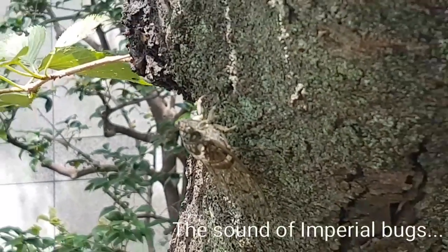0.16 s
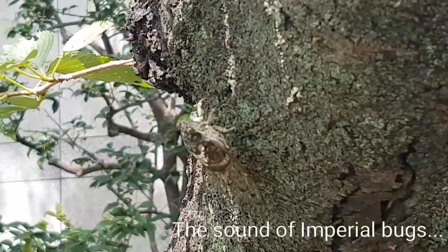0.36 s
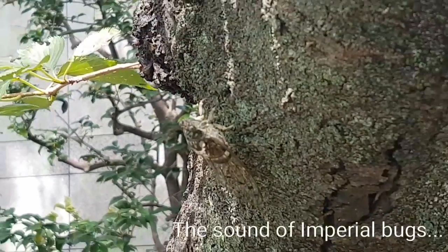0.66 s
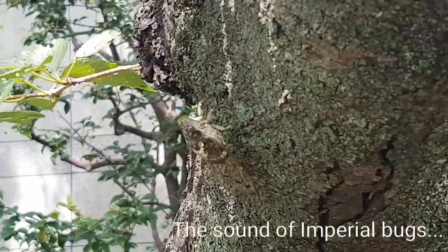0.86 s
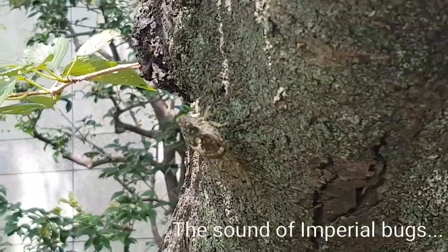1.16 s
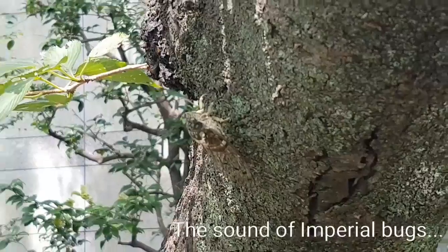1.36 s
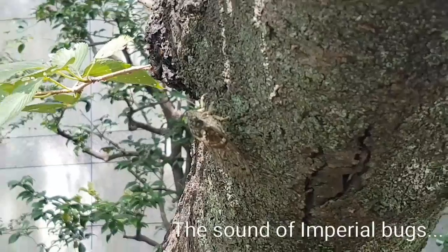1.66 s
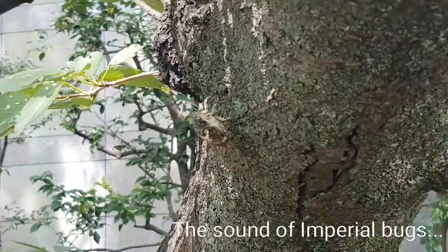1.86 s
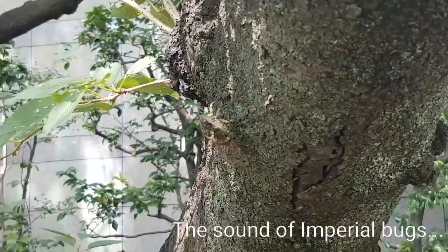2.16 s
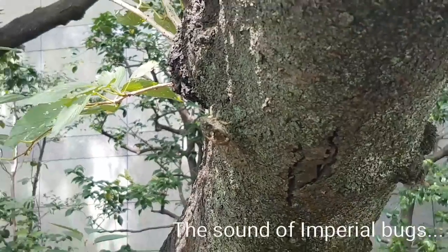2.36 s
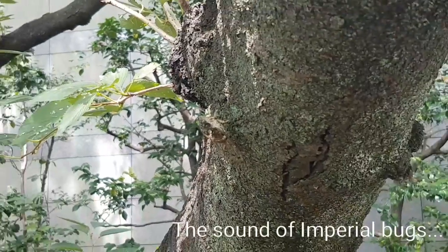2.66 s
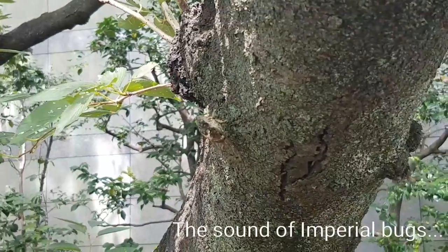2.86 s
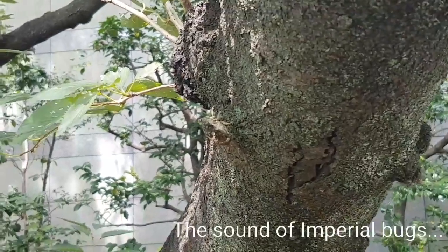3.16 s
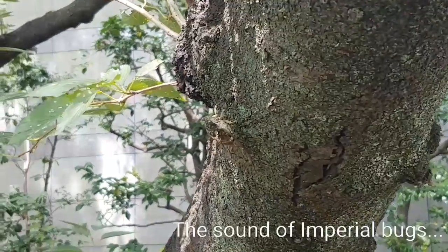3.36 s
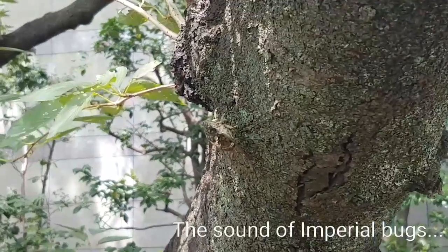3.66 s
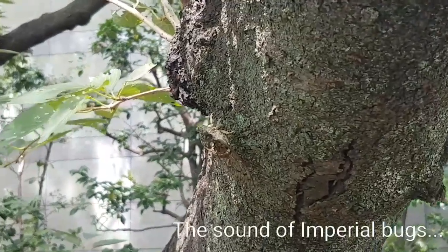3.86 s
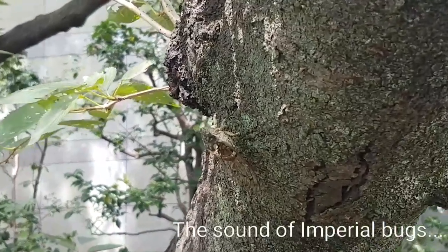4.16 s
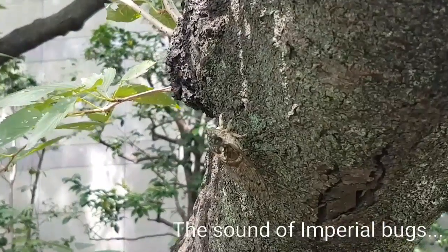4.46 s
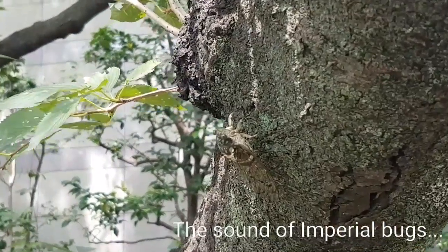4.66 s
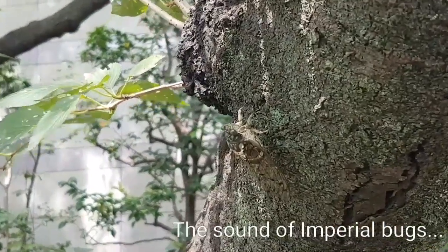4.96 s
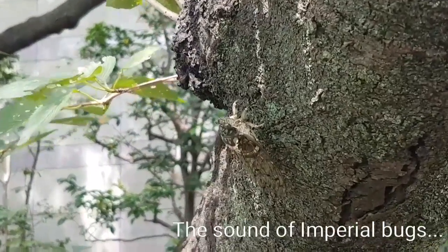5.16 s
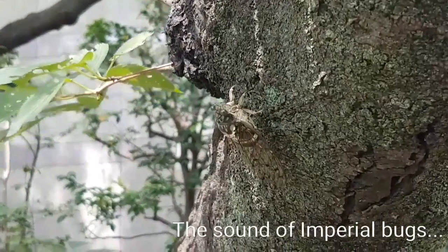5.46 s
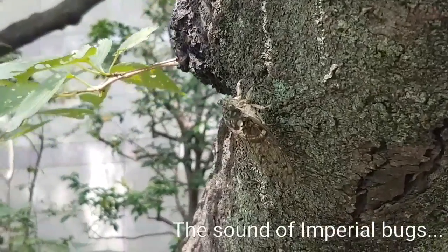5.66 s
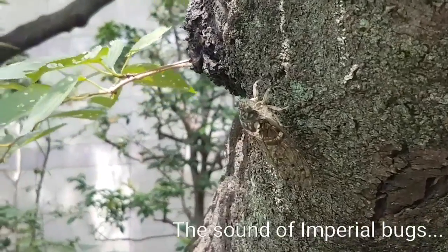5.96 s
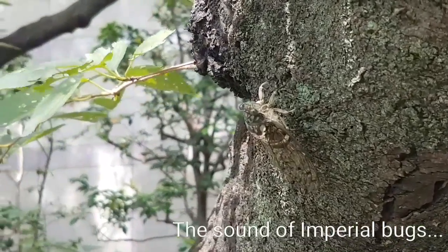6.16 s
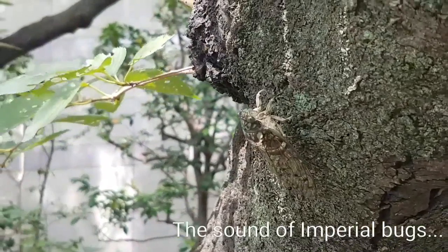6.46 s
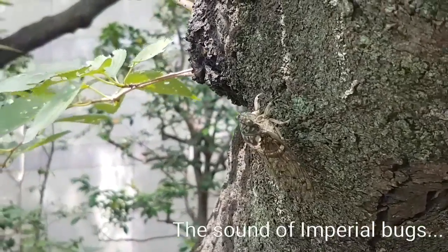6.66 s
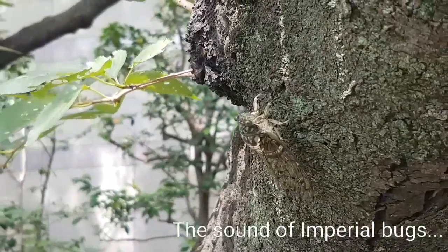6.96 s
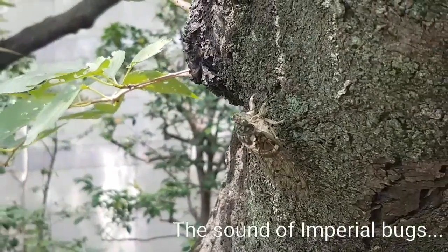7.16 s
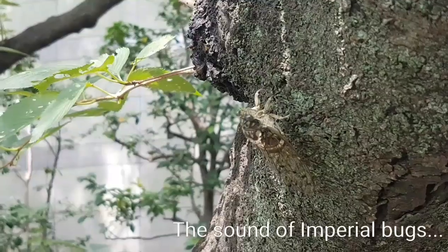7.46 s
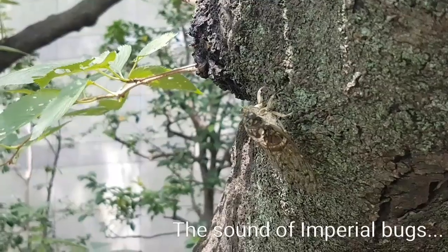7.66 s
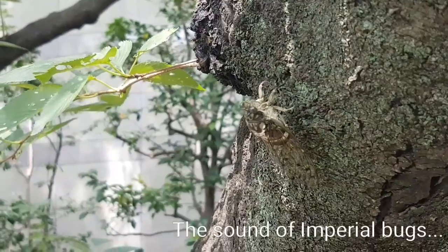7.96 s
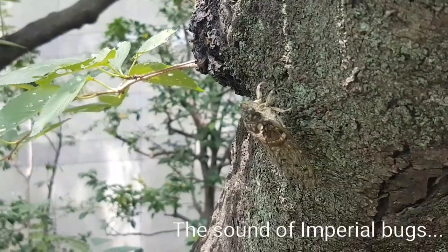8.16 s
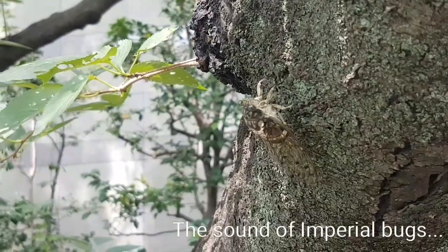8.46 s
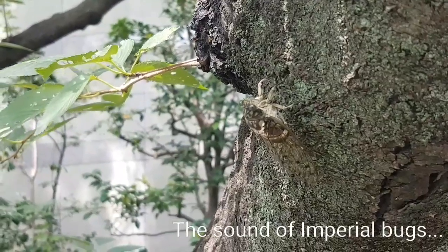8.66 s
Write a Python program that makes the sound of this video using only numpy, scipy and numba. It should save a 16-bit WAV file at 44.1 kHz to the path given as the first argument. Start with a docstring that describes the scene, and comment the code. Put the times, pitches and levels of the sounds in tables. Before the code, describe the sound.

Outdoors in a town garden, a single cicada on a tree trunk sings close to a stereo microphone. A bright buzz bursts, drops to a quieter slow rattle of ticks and dull snaps, then speeds up and swells into a piercing ring, followed by more bursts. The phrase repeats about every four seconds. Faint traffic rumble, rushing air and a low engine hum lie far behind.

```python
"""A town garden: a cicada sings on a tree trunk, close to the two-port microphone.
Its two tymbals buckle in and spring back in turn: high ticks and dull snaps while the abdomen is shut,
a loud ringing buzz, made by resonances that those clicks excite, as it opens.
Each phrase slows to a rattle, speeds up into a long swell and is followed by bursts, long or short.
Far off, noise rumbles and rushes as traffic, sines hum and whine as machines, and something twitters."""
import sys
import numpy as np
from scipy import signal
from scipy.fft import rfft, irfft, next_fast_len
from scipy.io import wavfile
from scipy.ndimage import uniform_filter1d, map_coordinates
from numba import njit

SR = 44100
rng = np.random.default_rng(int(sys.argv[2]) if len(sys.argv) > 2 else 0)


def digitize_waveform(pressure):
    """Quantize a signal to 16-bit integers and store it at the path in sys.argv[1].

    Rows of a 2-D input are taken as channels; values are limited to [-1, 1].
    """
    field = np.atleast_2d(pressure).T
    bounded = np.clip(field, -1, 1)
    quanta = np.round(bounded * 32767).astype(np.int16)
    wavfile.write(sys.argv[1], SR, quanta)


N = 388521
TIME = np.arange(N) / SR

# Muscle rhythm of each tymbal, before it wavers: start_s [s], rate [cycles per s]
MUSCLE_RHYTHM = [(0.0, 148.5), (0.13, 162.4), (0.23, 169.5), (0.31, 172.2), (0.45, 173.3), (0.57, 174.2),
                 (0.8, 167.6), (0.93, 160.0), (1.0, 145.7), (1.13, 141.0), (1.32, 134.5), (1.62, 117.4),
                 (1.95, 91), (2.2, 82), (2.45, 74), (2.85, 74.5), (3.05, 91), (3.26, 116), (3.75, 126.5),
                 (3.9, 134), (4.09, 159.7), (4.29, 168.5), (4.42, 172.3), (4.51, 170.8), (4.63, 171.0),
                 (4.82, 168.7), (5.0, 160.6), (5.1, 142.5), (5.25, 138.1), (5.45, 128), (5.7, 113.4),
                 (6.0, 90), (6.25, 85), (6.5, 76), (6.7, 82), (7.0, 114), (7.2, 122), (7.56, 131.5),
                 (7.88, 166.6), (7.95, 171.8), (8.02, 172.3), (8.21, 167.7), (8.3, 157.8), (8.44, 141),
                 (8.56, 139.6), (8.8, 127.2)]
# Phrases, a rattle that grows into a swell: start_s [s], climax_s [s], closing_s [s],
# buzz_gain_db [dB], tick_gain_db at full opening [dB]
PHRASES = [(-3.0, -0.06, .32, -2.5, -10), (1.03, 4.085, .18, -0.8, -9), (5.11, 7.878, .1, 1.9, -7.5),
           (8.39, 11.1, .1, 4.5, -12)]
# How the abdomen opens in every phrase: from_climax_s [s], opening [0-1], resonance_hz [Hz],
# back_ms [ms], the time for a tymbal to spring back before a wide opening shortens it
SWELL_POSTURE = [(-3.0, .1, 2950, 1.68), (-2.3, .115, 2900, 1.8), (-1.7, .22, 3120, 1.9),
                 (-1.3, .26, 3520, 1.85), (-1.0, .32, 3700, 1.95), (-.79, .6, 3930, 2.1),
                 (-.55, .57, 3990, 2.08), (-.33, .69, 4200, 2.0), (0, .89, 4450, 1.85)]
# Bursts after the swells, long or short: start_s [s], end_s [s], opening [0-1],
# top_resonance_hz [Hz], buzz_gain_db [dB], tick_gain_db that is approached when open [dB]
BURSTS = [(.268, .563, .98, 4560, .4, -17), (.915, 1.043, .68, 4200, -3, -12),
          (4.398, 4.617, .96, 4560, -1.5, -17), (4.978, 5.124, .77, 4300, -4.5, -15),
          (8.232, 8.396, .77, 4300, -4.6, -15)]
# The second tymbal limps behind the half cycle: start_s [s], late_ms [ms]
SECOND_TYMBAL_LIMP = [(0, .14), (.26, .13), (.32, .065), (.41, .06), (.435, .11), (.56, .11), (.62, .08),
                      (1.2, .13), (4.2, .125), (4.3, .085), (4.5, .06), (4.54, .11), (4.62, .11),
                      (4.75, .075), (5.3, .13), (7.7, .13), (7.88, .065), (7.96, .05), (8.1, .1),
                      (8.8, .14)]
# A wide-open abdomen pulls the tymbal back sooner, harder and more exactly:
# opening [0-1], sooner_ms [ms], wander_ms [ms], return_click_db re the inward click [dB]
SPRING_BACK = [(.25, 0.0, .012, -5.0), (.6, 0.0, .05, -5.0), (.89, 0.0, .06, -5.0), (.915, .28, 0.0, -2.0)]
# The return tick fades at speed: rate [cycles per s], return_db re the inward tick [dB]
RETURN_TICK = [(80, 1), (138, -6), (165, -17)]
# Lower edge of the buzz: opening [0-1], edge [share of the resonance]
BUZZ_LOW_EDGE = [(.15, .74), (.35, .72), (.6, .64), (.85, .7), (.95, .83)]
# The abdomen's upper mode: opening [0-1], ratio to the resonance [-], level_db [dB]
UPPER_MODE = [(.2, 1.6, 0.0), (.35, 1.42, -1.0), (.58, 1.34, 0.0), (.85, 1.42, -2.5)]
# Radiation of the abdomen: pitch_hz [Hz], level_db [dB]
ABDOMEN_RADIATION = [(500, -14), (1400, 4.6), (2200, 4.6), (3000, 1.8), (4500, 0), (5400, 0.5), (6500, 1),
                     (7400, -3.5), (8500, -10.5), (9700, -8.5), (11000, 0), (15000, -31)]
# Relative spectra of the ticks, abdomen shut and open: pitch_hz [Hz], level_db [dB]
SHUT_TICK_SPECTRUM = [(6000, -70), (8500, -40), (10000, -20), (11200, -4), (12400, 3.5), (13600, 5.5),
                      (14500, 3), (15500, -6)]
OPEN_TICK_SPECTRUM = [(6000, -60), (8500, -26), (9700, -12), (10900, 0), (12000, 1), (13600, 1.5),
                      (14500, 1), (15500, -6)]
# Relative spectrum of the dull snaps: pitch_hz [Hz], level_db [dB]
SNAP_SPECTRUM = [(150, -8), (330, 1.5), (520, -1), (900, -2.5), (1500, -1.5), (3000, -2.5), (5000, 1),
                 (6500, 2), (7700, 0), (8700, -14), (11000, -73)]
# Left-right balance and uneven loudness of the ticks:
# start_s [s], left_right_db before each tymbal's own [dB], gain_db [dB]
TICK_BALANCE = [(0.0, 6.0, -1.5), (0.22, 7.5, 1.5), (0.8, 5.5, 1.0), (1.25, 6.0, 1.3), (2.5, 5.5, -0.5),
                (3.1, 5.0, 1.3), (3.85, 1.5, -1.8), (4.25, 3.0, -0.7), (5.3, 2.0, -0.7), (5.9, 0.0, -1.7),
                (6.4, -0.5, -1.2), (6.85, -0.5, 1.3), (7.2, -0.7, 0.0), (7.6, -0.7, -1.0),
                (7.92, -1.2, 1.5), (8.1, -1.0, -1.0), (8.45, -1.2, -2.5), (8.8, -1.2, 0.8)]
# The far tymbal's ticks come into view as the microphone moves: start_s [s], level_db re the near one [dB]
FAR_TICK_LEVEL = [(0, -8), (2.5, -10), (4.2, -8), (5.3, -7), (6.4, -5), (8.1, -4), (8.8, -6)]
# The ticks reach the left port first: start_s [s], lead_ms [ms]
TICK_PORT_LEAD = [(0, .016), (5.6, .015), (6.0, .024), (7.2, .021)]
# The town, before the trims in town(): start_s [s], rumble_db [dB], rush_db [dB], engine_hum_db [dB]
TOWN_LEVELS = [(0.0, -43, -40, -48), (0.07, -42, -41, -45), (1.44, -55, -53, -61), (3.19, -39, -38, -39),
               (3.75, -39, -34, -40), (4.21, -40, -42, -38), (4.36, -51, -50, -49), (4.9, -54, -54, -51),
               (5.88, -55, -52, -53), (6.25, -51, -55, -55), (7.25, -46, -48, -42), (7.89, -47, -52, -46),
               (8.1, -53, -58, -54), (8.28, -54, -58, -59), (8.73, -55, -51, -58), (8.8, -55, -52, -73)]
# Engine hum, before it wanders: start_s [s], pitch_hz [Hz]
HUM_PITCH = [(0, 88.9), (2.5, 91.66), (4.0, 89.87), (5.5, 89.1), (7.0, 87.8), (8.8, 84.7)]
# Partials of the engine hum: order [multiple of its pitch], level_db [dB]
HUM_ORDERS = [(1, 0), (3, -13), (6, -14.5)]
# Relative spectra of traffic rumble, traffic rush and garden hiss: pitch_hz [Hz], level_db [dB]
RUMBLE_SPECTRUM = [(20, -36), (40, -8.5), (70, -4), (120, -0.5), (190, -1.5), (300, -10.5), (600, -26),
                   (2000, -27)]
RUSH_SPECTRUM = [(120, -27), (260, 1.5), (420, -3.5), (800, -10.5), (1500, -14), (4000, -7), (12000, -48)]
AIR_SPECTRUM = [(30, 6), (200, -28), (1000, -6), (1800, 8), (2800, 7), (4000, 3), (6500, 12), (8500, -20),
                (15000, -65)]
# Faint high twitter far off, before it flutters: start_s [s], level_db [dB]
TWITTER_LEVEL = [(2.33, -75), (2.44, -44), (2.7, -43), (2.85, -75)]
# Relative spectrum of the twitter: pitch_hz [Hz], level_db [dB]
TWITTER_SPECTRUM = [(3800, -35), (4500, 0), (5000, -3), (5500, 0), (6200, -35)]

BAND_PASS, HIGH_PASS = -1, 1
FULL_SPEED_PER_S = 170   # tymbal cycles per second
# Movement of the abdomen
BURST_ATTACK_S, BURST_RELEASE_S = .034, .054
ATTACK_EASE, RELEASE_EASE = 1.7, 1.4   # above 1 the abdomen starts and stops moving gently
BURST_FIRST_SHARE = .86   # a burst jumps to this share of its opening, then widens to its end
SHUT_HZ = 2800   # resonance of the shut abdomen
SWELL_GLIDE_POWER, BURST_GLIDE_POWER = 2.4, 1.0   # how much faster the resonance sinks than the opening
START_SAG, END_SAG = .38, .15   # share of a burst's resonance rise that is missing at either end
ARCH_TOP = .62   # share of the burst after which the resonance tops out
REST_BACK_MS = 1.76   # time to spring back in the bursts, before a wide opening shortens it
# Timing scatter of the tymbals: at full speed, added at a crawl, added under strain
JITTER_S, SLOW_JITTER_S, STRAIN_JITTER_S = .000005, .00012, .00004
LONGEST_LAG_S = .0059   # longest wait of the second tymbal after the beat, before scatter
# Ring and buzz
SHUT_WIDTH_HZ, OPEN_WIDTH_HZ, UPPER_WIDTH_HZ = 620, 335, 750
SHUT_RING_DB, OPEN_RING_DB = 10.0, 16.0   # gain of the ring's resonance, fed by the bare membrane
BUZZ_DB, BUZZ_DB_PER_DECADE, SHUT_LEAK = -16, 32, .08   # level against opening plus leak
BUZZ_PAN_DB = -4.3
# Ticks and snaps: level at full speed, growth with speed
TICK_DB, TICK_DB_PER_DECADE = -22.0, 13
SNAP_DB, SNAP_DB_PER_DECADE = -39.3, 12
TICK_MUTE_POWER = 2.5   # steepness with which the opening mutes the ticks
TICK_CLOSE_SHARE = .38   # the ticks die down over this share of a burst
TICK_LEAD_S = .02   # the ticks change just ahead of the buzz
SNAP_MUTE_SHARE = .8   # the opening mutes the dull snaps less than the ticks
BLURRED_SHARE = .7   # share of tick power that is blurred into a diffuse hiss when wide open
BARK_ECHO_DB, GARDEN_ECHO_DB = -7.5, -15.5
# Garden hiss, faint fading machine whine, top cut
GARDEN_AIR_DB = -53
WHINE_HZ, WHINE_DB, WHINE_FADE_DB_PER_S = 564, -46.5, 14   # centre pitch, level at the start, fade
CUTOFF_HZ = 14650


def from_db(db):
    """Decibels to gain."""
    return 10 ** (np.asarray(db) / 20)


def rms_one(x):
    """Scale to rms 1."""
    return x / np.sqrt(np.mean(x ** 2) + 1e-20)


def read(rows, when=TIME):
    """The columns of a curve table, interpolated at the given values of its first column."""
    at, *columns = np.transpose(rows)
    return [np.interp(when, at, column) for column in columns]


def colour(x, spectrum):
    """Filter by a spectrum of (Hz, dB) points, without phase shift."""
    hz, db = np.transpose(spectrum)
    size = next_fast_len(N + 4096)
    grid = np.maximum(np.fft.rfftfreq(size, 1 / SR), 1)
    gain = from_db(np.interp(np.log(grid), np.log(hz), db))
    return irfft(rfft(x, size) * gain, size)[..., :N]


def drift(per_s):
    """Slow chance of spread 1, with per_s random points a second."""
    return rms_one(np.interp(TIME * per_s, np.arange(4000), rng.standard_normal(4000)))


def clicks(times, db):
    """Band-limited clicks that may fall between samples."""
    at = times[:, None] * SR
    taps = np.round(at).astype(int) + np.arange(-8, 9)
    shape = np.sinc(taps - at) * np.cos(np.pi * (taps - at) / 18) ** 2
    inside = (taps >= 0) & (taps < N)
    return np.bincount(taps[inside], (shape * from_db(db)[:, None])[inside], N)


@njit
def resonate(x, hz, width_hz, zero):
    """A resonance with moving centre and width: band-pass if zero is -1, resonant high-pass if it is 1."""
    y = np.zeros(len(x))
    for i in range(2, len(x)):
        r = np.exp(-np.pi * width_hz[i] / SR)
        w = 2 * np.pi * hz[i] / SR
        gain = (1 - r * r) / 2 if zero < 0 else r
        driven = gain * (x[i] - (1 + zero) * x[i - 1] + zero * x[i - 2])
        y[i] = driven + 2 * r * np.cos(w) * y[i - 1] - r * r * y[i - 2]
    return y


def even(x):
    """Hold the power at 1 over a few cycles, keeping the single clicks."""
    power = uniform_filter1d(uniform_filter1d(x ** 2, size=1200), size=900)
    return x / np.sqrt(np.maximum(power, 1e-14))


def place(x, pan_db, lead_ms):
    """Two microphone ports: the left one hears the insect a little earlier."""
    late = map_coordinates(x, [np.arange(N) - lead_ms * SR / 1000], order=5)
    gains = from_db(np.array([[1], [-1]]) * pan_db / 2)
    return np.array([x, late]) * gains / np.sqrt(np.mean(gains ** 2, axis=0))


def scatter(x, t60, delay_s):
    """Dense echoes that die away by 60 dB in t60 seconds, unrelated at the two ports."""
    t = TIME[:SR // 2]
    tail = rng.standard_normal((2, len(t))) * from_db(-60 * t / t60) * (t > delay_s)
    tail /= np.sqrt(np.sum(tail ** 2, axis=1, keepdims=True))
    return signal.fftconvolve(x[None], tail, axes=1)[:, :N]


def stereo_noise(spectrum, side_db):
    """Coloured noise of rms 1 whose width grows from the bass upwards."""
    mid, side = colour(rng.standard_normal((2, N)), spectrum)
    side = from_db(side_db) * colour(side, [(80, -14.5), (250, -13), (700, -4.5)])
    return rms_one(np.array([mid + side, mid - side]))


def swell_move(when, start, climax, closing_s, buzz_db, tick_db):
    """The abdomen opens along the swell curve, then closes after the climax while its resonance sinks."""
    held, hz, back_ms = read(SWELL_POSTURE, when - climax)
    gate = (when > start) * np.exp(-(np.maximum(when - climax, 0) / closing_s) ** RELEASE_EASE)
    rise_hz = (hz - SHUT_HZ) * gate ** SWELL_GLIDE_POWER
    return held * gate, rise_hz, back_ms, buzz_db, tick_db * held * gate ** TICK_MUTE_POWER


def burst_move(when, start, end, wide, hz, buzz_db, tick_db):
    """The abdomen jumps open, widens a little and shuts; its resonance arches meanwhile."""
    since = np.maximum(when - start, 0)
    progress = np.minimum(since / (end - start), 1)
    release = np.exp(-(np.maximum(when - end, 0) / BURST_RELEASE_S) ** RELEASE_EASE)
    gate = (1 - np.exp(-(since / BURST_ATTACK_S) ** ATTACK_EASE)) * release
    share = BURST_FIRST_SHARE + (1 - BURST_FIRST_SHARE) * progress
    sag = np.where(progress < ARCH_TOP, START_SAG, END_SAG)
    arch = 1 - sag * np.interp(progress, [0, ARCH_TOP, 1], [-1, 0, 1]) ** 2
    rise_hz = (hz - SHUT_HZ) * arch * gate ** BURST_GLIDE_POWER
    muted = (1 - np.exp(-progress / TICK_CLOSE_SHARE)) * release ** TICK_MUTE_POWER
    return wide * share * gate, rise_hz, np.full(len(when), REST_BACK_MS), buzz_db, tick_db * muted


def posture(when=TIME):
    """The abdomen's opening 0-1, resonance in Hz, spring-back time in ms, buzz and tick gains in dB."""
    moves = [swell_move(when, *phrase) for phrase in PHRASES]
    moves += [burst_move(when, *burst) for burst in BURSTS]
    openings, rises, backs, buzz_gains, tick_gains = map(np.array, zip(*moves))
    # the widest move counts most
    weights = openings ** 2 + 1e-12
    weights /= weights.sum(axis=0)
    is_open = np.clip(openings.max(axis=0), 0, 1)
    centre_hz = SHUT_HZ + rises.max(axis=0)
    back_ms = np.sum(backs * weights, axis=0)
    return is_open, centre_hz, back_ms, buzz_gains @ weights, tick_gains.min(axis=0)


def tymbal(buckle, back, level_db, back_db, spread_db):
    """One tymbal buckles and springs back, never twice alike: inward clicks, return clicks and ticks."""
    a, b, c, d = level_db + spread_db * rng.standard_normal((len(buckle), 4)).T
    ticks = clicks(buckle, c) + clicks(back, d + back_db)
    return clicks(buckle, a), clicks(back, b), ticks


def tymbal_pair(second_db=-0.8, slow_second_db=-1.0, waver_share=.02, waver_per_s=22):
    """The two tymbals work in turn, in time with the muscle rhythm, which wavers when it is slow."""
    pace, = read(MUSCLE_RHYTHM)
    slowness = np.clip(FULL_SPEED_PER_S / pace - 1, 0, 1)
    pace = pace * (1 + waver_share * slowness * drift(waver_per_s))
    cycles = np.cumsum(pace) / SR
    beat = np.interp(np.arange(int(cycles[-1])), cycles, TIME)
    rate, = read(MUSCLE_RHYTHM, beat)
    is_open, _, back_ms, _, _ = posture(beat)
    sooner_ms, wander_ms, _ = read(SPRING_BACK, is_open)
    back_db, = read(RETURN_TICK, rate)
    chance = rng.standard_normal((len(beat), 4)).T
    # a slow muscle keeps time less well, above all with the abdomen open
    slack = np.clip(168 / rate - 1, 0, 1)
    strain = is_open * np.minimum(6 * slack, 1)
    loose_s = JITTER_S + SLOW_JITTER_S * slack ** 0.73 + STRAIN_JITTER_S * strain
    late_s = read(SECOND_TYMBAL_LIMP, beat)[0] / 1000
    first = beat + loose_s * chance[0]
    second = beat + np.minimum(.5 / rate + late_s, LONGEST_LAG_S) + loose_s * chance[1]
    wander = np.array([np.interp(beat, TIME, drift(9)) for _ in range(2)])
    back_s = (back_ms - sooner_ms + wander_ms * wander) / 1000
    back_s = back_s + (JITTER_S + STRAIN_JITTER_S * strain / 2) * chance[2:]
    spread_db = .5 + 1.1 * slack
    second_level_db = second_db + slow_second_db * slack
    return (tymbal(first, first + back_s[0], 0, back_db, spread_db),
            tymbal(second, second + back_s[1], second_level_db, back_db, spread_db))


def abdomen(inward, outward, centre_hz, is_open, membrane_width_hz=3350.0):
    """The clicks ring in the hollow abdomen, longer as it opens; power 1."""
    broad = np.full(N, membrane_width_hz)
    return_db = read(SPRING_BACK, is_open)[2]
    # the membrane sounds lower when it buckles than when it springs back
    membrane = resonate(inward, 0.91 * centre_hz, broad, BAND_PASS)
    membrane += from_db(return_db) * resonate(outward, 1.22 * centre_hz, 2.2 * broad, BAND_PASS)
    width_hz = SHUT_WIDTH_HZ + (OPEN_WIDTH_HZ - SHUT_WIDTH_HZ) * is_open
    ring_db = SHUT_RING_DB + (OPEN_RING_DB - SHUT_RING_DB) * is_open
    ring = from_db(ring_db) * resonate(membrane, centre_hz, width_hz, BAND_PASS)
    upper_ratio, upper_db = read(UPPER_MODE, is_open)
    upper = resonate(membrane, upper_ratio * centre_hz, np.full(N, UPPER_WIDTH_HZ), BAND_PASS)
    ring += from_db(upper_db) * upper
    # little is radiated below the resonance, so the lower edge of the buzz glides too
    edge_hz = read(BUZZ_LOW_EDGE, is_open)[0] * centre_hz
    voice = resonate(membrane + ring, edge_hz, 0.26 * centre_hz, HIGH_PASS)
    voice = resonate(voice, 0.58 * centre_hz, 0.55 * centre_hz, HIGH_PASS)
    return even(colour(voice, ABDOMEN_RADIATION))


def tick_colour(ticks, is_open):
    """The ticks spread lower as the abdomen opens; power 1."""
    share = np.clip(is_open, 0, 1) ** 1.5
    shut = even(colour(ticks, SHUT_TICK_SPECTRUM))
    opened = even(colour(ticks, OPEN_TICK_SPECTRUM))
    return even((1 - share) * shut + share * opened)


def reflections(x, level_db, nearest_ms=1.2, farthest_ms=7., sway_ms=0.06, count=6):
    """Trunk and leaves send back a few echoes to each port; their delays wander as the hand sways."""
    out = np.zeros((2, N))
    for port in range(2):
        # each delay is varied by up to a fifth
        for delay_ms in np.geomspace(nearest_ms, farthest_ms, count) * rng.uniform(.8, 1.2, count):
            late = (delay_ms + sway_ms * drift(2.5)) * SR / 1000
            out[port] += map_coordinates(x[port], [np.arange(N) - late], order=2)
    return from_db(level_db) * out / np.sqrt(count)


def cicada(near_pan_db=1.5, far_pan_db=-5.0, snap_pan_db=-2.0):
    """The buzz of the abdomen, and the high ticks and dull snaps that the tymbals radiate directly."""
    is_open, centre_hz, _, buzz_gain, tick_gain = posture()
    tick_gain = np.interp(TIME + TICK_LEAD_S, TIME, tick_gain)
    rate, = read(MUSCLE_RHYTHM)
    tick_pan, uneven_db = read(TICK_BALANCE)
    lead_ms, = read(TICK_PORT_LEAD)
    far_db, = read(FAR_TICK_LEVEL)
    speed_decades = np.log10(rate / FULL_SPEED_PER_S)
    buzz_db = BUZZ_DB + BUZZ_DB_PER_DECADE * np.log10(is_open + SHUT_LEAK) + buzz_gain
    tick_db = TICK_DB + TICK_DB_PER_DECADE * speed_decades + tick_gain + uneven_db
    snap_db = SNAP_DB + SNAP_DB_PER_DECADE * speed_decades + SNAP_MUTE_SHARE * tick_gain
    (in_a, out_a, ticks_a), (in_b, out_b, ticks_b) = tymbal_pair()
    voice = abdomen(in_a + in_b, out_a + out_b, centre_hz, is_open)
    buzz = place(from_db(buzz_db) * voice, BUZZ_PAN_DB, lead_ms=.025)
    # the tymbals lie on opposite flanks: the near one faces the left port, the far one the right
    near_tick = from_db(tick_db) * tick_colour(ticks_a, is_open)
    far_tick = from_db(tick_db + far_db) * tick_colour(ticks_b, is_open)
    tick = place(near_tick, tick_pan + near_pan_db, lead_ms)
    tick += place(far_tick, tick_pan + far_pan_db, lead_ms)
    blurred_share = BLURRED_SHARE * is_open
    blurred = scatter(np.sqrt(blurred_share) * tick.mean(axis=0), t60=0.06, delay_s=.001)
    tick = np.sqrt(1 - blurred_share) * tick + blurred
    snaps = even(colour(ticks_a + 0.44 * ticks_b, SNAP_SPECTRUM))
    snap = place(from_db(snap_db) * snaps, snap_pan_db, lead_ms=0.064)
    direct = buzz + tick + snap
    # as the abdomen opens, the echoes hold less of the buzz and more of the ticks
    echoed = from_db(-1 - 6 * is_open) * buzz + snap + from_db(6 * is_open - 1.5) * tick
    near = reflections(echoed, BARK_ECHO_DB)
    garden = from_db(GARDEN_ECHO_DB) * scatter(direct.mean(axis=0), t60=0.15, delay_s=.006)
    return direct + near + garden


def town(rumble_db=5.5, rush_db=5.8, hum_db=-1.0, waver_db=-0.5):
    """Far traffic and garden hiss as coloured noise, an engine note and a faint whine as wavering sines."""
    rumble_level, rush_level, hum_level = read(TOWN_LEVELS)
    turns = np.cumsum(read(HUM_PITCH)[0] + 1.13 * drift(9)) / SR
    hum = np.zeros(N)
    for order, order_db in HUM_ORDERS:
        level_db = hum_level + hum_db + order_db + waver_db * drift(14)
        hum += from_db(level_db) * np.sin(2 * np.pi * order * turns)
    whine_db = WHINE_DB - WHINE_FADE_DB_PER_S * TIME + waver_db * drift(12)
    whine_turns = np.cumsum(WHINE_HZ + 3 * drift(20)) / SR
    whine = from_db(whine_db) * np.sin(2 * np.pi * whine_turns)
    rumble = from_db(rumble_level + rumble_db) * stereo_noise(RUMBLE_SPECTRUM, side_db=3.0)
    rush = from_db(rush_level + rush_db) * stereo_noise(RUSH_SPECTRUM, side_db=3.5)
    air = from_db(GARDEN_AIR_DB) * stereo_noise(AIR_SPECTRUM, side_db=-3)
    # the root of 2 turns the sine levels into rms
    return np.sqrt(2) * (hum + whine) + rumble + rush + air


def twitter(flutter_db=1.8, flutter_per_s=45):
    """A brief twitter from deeper in the garden: a band of noise whose level flutters."""
    level_db = read(TWITTER_LEVEL)[0] + flutter_db * drift(flutter_per_s)
    return from_db(level_db) * stereo_noise(TWITTER_SPECTRUM, side_db=0.0)


def scene():
    """The insect close by, in front of the town and the deeper garden."""
    return cicada() + town() + twitter()


def record(dry):
    """The microphone signal with its top cut steeply by an elliptic low-pass."""
    return signal.sosfilt(signal.ellip(10, .2, 80, CUTOFF_HZ, fs=SR, output="sos"), dry)


dry = scene()
out = record(dry)
digitize_waveform(out)
```